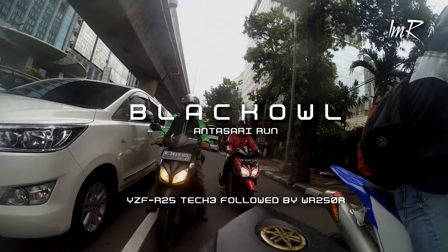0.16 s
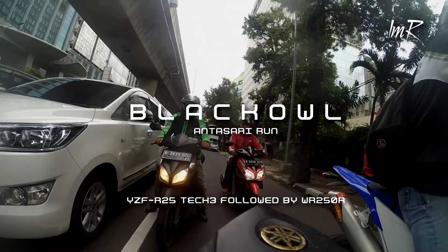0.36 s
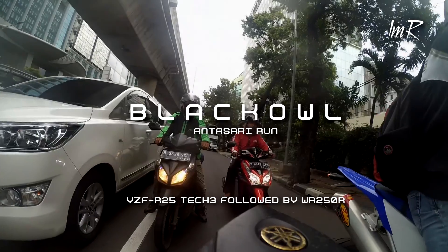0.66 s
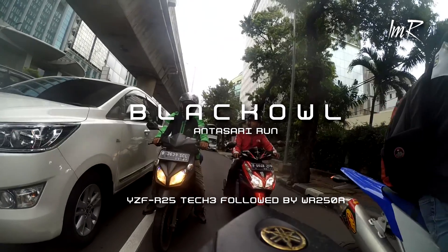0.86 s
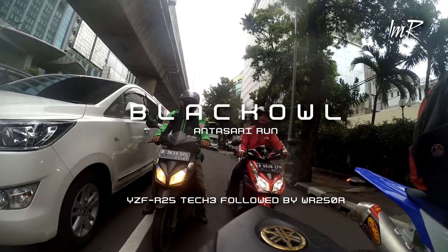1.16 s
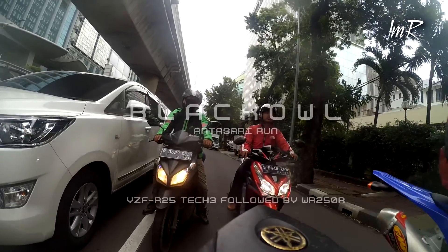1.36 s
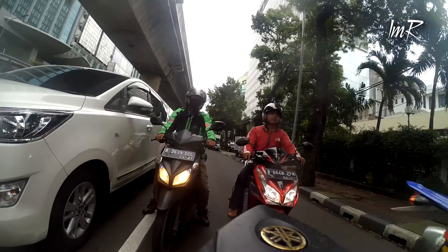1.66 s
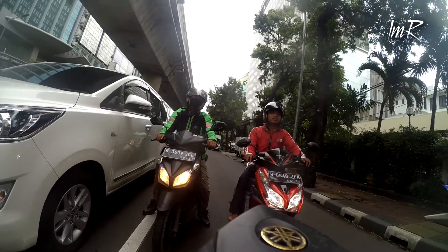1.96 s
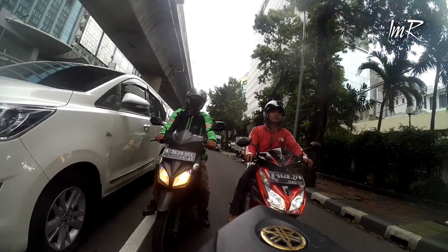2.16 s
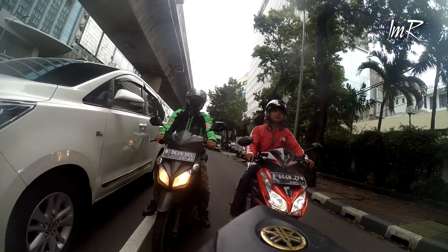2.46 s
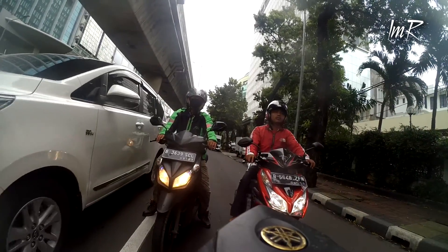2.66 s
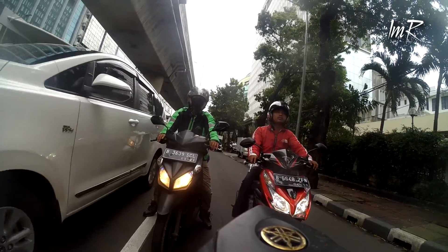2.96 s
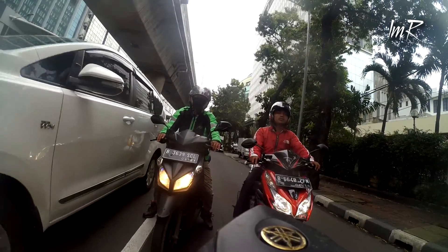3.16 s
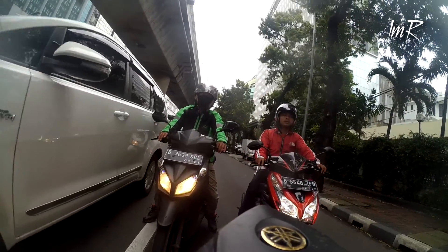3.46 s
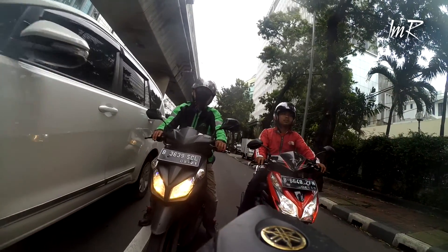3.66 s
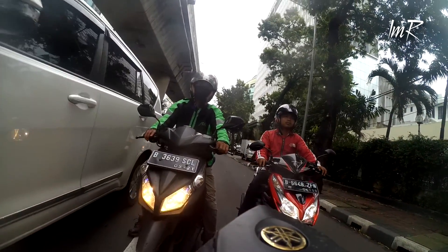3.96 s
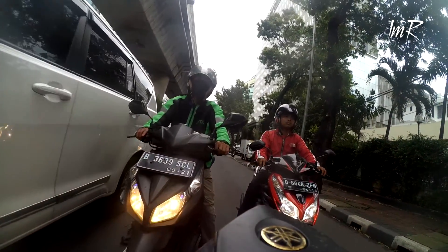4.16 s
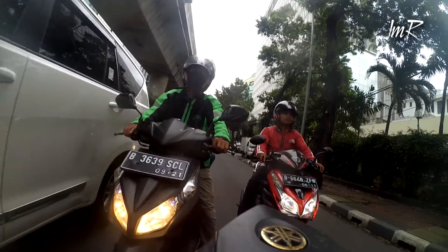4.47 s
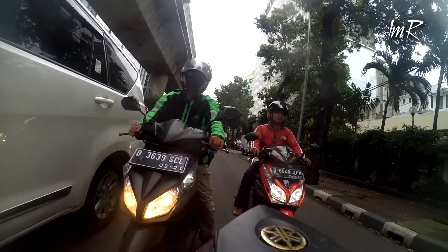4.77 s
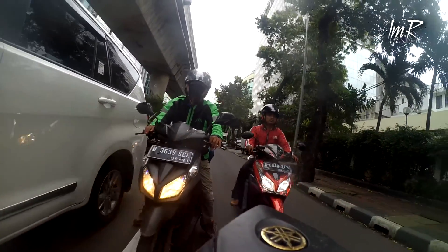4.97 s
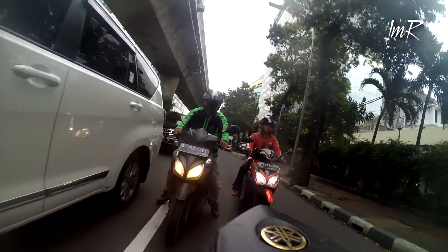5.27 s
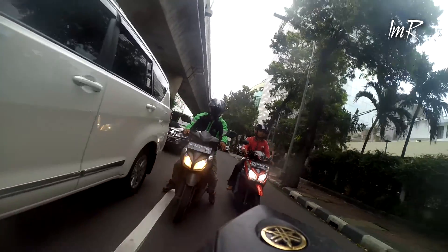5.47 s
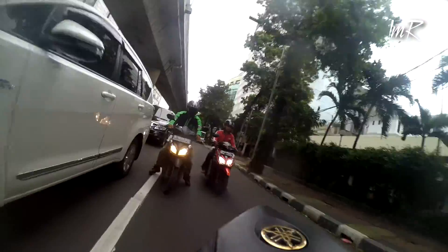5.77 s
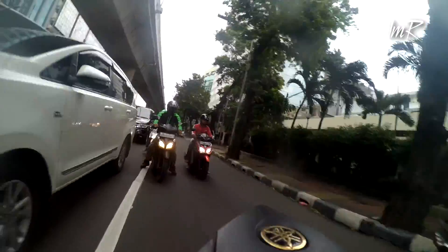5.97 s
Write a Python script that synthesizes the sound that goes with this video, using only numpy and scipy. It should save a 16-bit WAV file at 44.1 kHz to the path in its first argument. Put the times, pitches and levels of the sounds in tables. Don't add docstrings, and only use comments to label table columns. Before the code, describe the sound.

Close low chugging motorbike idle over dull traffic, a steel gear clunk and clutch lurches, then fast rising buzzy revs with small metallic rattles.

```python
import sys
import numpy as np
from scipy import signal
from scipy.fft import rfft, irfft
from scipy.io import wavfile
from scipy.ndimage import uniform_filter1d

SR = 44100
rng = np.random.default_rng(int(sys.argv[2]) if len(sys.argv) > 2 else 0)


def boost_factor(decibels):
    exponent = np.asarray(decibels, float) / 20
    return 10 ** exponent


def master_out(mix):
    frames = np.transpose(np.atleast_2d(mix))
    ceiling = np.clip(frames, -1, 1)
    pcm = np.round(ceiling * 32767).astype(np.int16)
    wavfile.write(sys.argv[1], SR, pcm)


N = 269892


def level(x, db=0):
    return x * boost_factor(db) / np.sqrt(np.mean(x ** 2))


def ring(x, modes, flip=-1):
    total = 0
    for k, (pitch_hz, width_hz, db) in enumerate(modes):
        b, a = signal.iirpeak(pitch_hz, pitch_hz / width_hz, SR)
        total = total + flip ** k * boost_factor(db) * signal.lfilter(b, a, x)
    return total


def cut(x, hz, kind, order=2):
    return signal.sosfilt(signal.butter(order, hz, kind, fs=SR, output="sos"), x)


def noise():
    return rng.standard_normal(N)


def walk(rate_hz):
    k = int(SR / rate_hz)
    steps = np.repeat(rng.standard_normal(N // k + 1), k)
    return uniform_filter1d(uniform_filter1d(steps, k), k)[:N]


def rise(x, middle, span):
    return 1 / (1 + np.exp(-(x - middle) / span))


def since(cycle, place, scatter_db):
    turn = cycle - place + 1
    strength = boost_factor(scatter_db * rng.standard_normal(256))
    return turn % 1, strength[turn.astype(int)]


# time_s, strokes_hz
SPEED = [(0, 47.18), (1.29, 46.39), (1.7, 46.72), (2.83, 46.7), (3.56, 47.29), (3.83, 46.26), (4.04, 47),
         (4.12, 45), (4.18, 47.5), (4.26, 62), (4.32, 72.47), (4.41, 105.78), (4.66, 128.27), (4.7, 134.25),
         (4.82, 139), (4.96, 138.4), (5.11, 132.7), (5.2, 132.1), (5.57, 149.5), (5.71, 160.3), (6.12, 198)]


def engine_speed(t):
    cycle_hz = np.interp(t, *np.transpose(SPEED)) / 4
    return cycle_hz, np.cumsum(cycle_hz) / SR + .93


def shake(cycle, cycle_hz):
    beat_db = np.interp(cycle_hz, [12, 14, 22, 28, 33, 34.5, 38, 42, 50],
                        [-40, -4, 2, 1, -6, -17, -12, -11, -13])
    beat_db = beat_db + 1.2 * walk(7)
    rocking = np.cos(8 * np.pi * (cycle - .137))
    beat = boost_factor(beat_db) * np.cos(6 * np.pi * (cycle + .1))
    return -np.sqrt(2) * (rocking + beat)


# place (0-1), push_db, length_cycles
STROKES = [
    (.09, -36, .047),
    (.344, -33.7, .04),
    (.393, -34.4, .024),
    (.441, -40.6, .023),
    (.623, -29.7, .083),
    (.767, -36.7, .038),
    (.862, -32.3, .046),
]
# pitch_hz, width_hz, level_db
TAIL = [(77.9, 27, 16), (167.8, 25.7, 16), (126.3, 29, 14.7)]


def pushes(cycle):
    push = 0
    for place, push_db, length_cycles in STROKES:
        gone, size = since(cycle, place - .5, scatter_db=.9)
        push = push - boost_factor(push_db) * size * np.exp(-((gone - .5) / length_cycles) ** 2)
    push = cut(push, 30.4, "high")
    return push + ring(push, TAIL)


# pitch_hz, width_hz, level_db
FRAME = [(42.3, 98, 4), (112, 120, 12.5), (173.3, 80, 5), (278, 84, -11.5), (474, 61, -5)]


def firings(cycle):
    first_place = 0.3215
    blow = 0
    for place in (first_place, first_place + 1 / 4):
        gone, size = since(cycle, place, scatter_db=1.2)
        blow = blow - size * gone * np.exp(-gone / 0.022)
    return level(ring(blow, FRAME))


def bursts(cycle, table, floor):
    out = floor
    for place, db, fade_cycles in table:
        gone, size = since(cycle, place, scatter_db=1.2)
        out = out + boost_factor(db) * size * (1 - np.exp(-gone / .012)) * np.exp(-gone / fade_cycles)
    return out


# place (0-1), clatter_db, fade_cycles
BURSTS = [
    (.05, -3.5, 0.16),
    (.27, 1.5, 0.31),
    (.53, -5, 0.26),
    (.72, -2.5, 0.38),
]
# place (0-1), puff_db, fade_cycles
PUFFS = [
    (.01, -12, .08),
    (.225, -4, .25),
    (.47, 1, .14),
    (.615, -2, .08),
    (.81, -10, .08),
]
# place (0-1), knock_db
KNOCKS = [(.02, -14), (.13, -7), (.285, -4), (.31, -3), (.33, -1), (0.371, -5), (.425, 0), (.455, -8),
          (0.581, -4.5), (.605, -6), (.665, -3.5), (0.751, -4), (.935, -8)]
# pitch_hz, width_hz, level_db
CASE = [(646, 31.5, 4), (737, 48, 0.5), (904, 74, 3.5), (1034.6, 34.7, 4.5), (1246.5, 57, -1),
        (2202, 77, -6), (2625, 310, -11.5), (2340, 43, -16), (1380, 30, -25), (1780, 74, -16),
        (2000, 270, -15)]
# pitch_hz, width_hz, level_db
COVER = [(3158, 129, -3.5), (3526, 111, -6), (3890, 31, -22), (4270, 28, -16.5)]
# pitch_hz, width_hz, level_db
LENS = [(5570, 160, -24.5), (7010, 230, -32), (8120, 340, -38)]
# pitch_hz, width_hz, level_db
RASP = [(538, 92, 2.5), (820, 160, 2), (1230, 224, 0.5), (2368, 232, 0), (3103, 133, -0.5),
        (3570, 630, -5.5), (4800, 3550, -17), (7420, 4300, -23)]


def clatter(cycle, cycle_hz):
    burst = bursts(cycle, BURSTS, .12 + .01 * cycle_hz)
    burst = burst / np.sqrt(cycle_hz / 12)
    puff = bursts(cycle, PUFFS, .1)

    happens = rng.random(N) < 60 * cycle_hz / SR
    tick_db = np.minimum(2.8 * rng.exponential(size=N), 13)
    tick = happens * boost_factor(tick_db) * rng.choice([-1, 1], N)
    knock = 0
    for place, db in KNOCKS:
        gone, size = since(cycle, place, scatter_db=1.5)
        knock = knock + boost_factor(db) * size * (np.diff(gone, prepend=0) < 0)
    drive = burst * (level(tick, -7) + noise()) + level(cut(knock, 2000, "low"), -8)

    exhaust = ring(puff * noise(), [(465.0, 45.0, 6.9)]) + ring(noise(), [(242.2, 22.0, 3.1)])
    shell = cut(cut(ring(drive, CASE), 590, "high", order=4), 2750, "low", order=8)
    lid = cut(cut(ring(drive, COVER, flip=1), 2950, "high", order=4), 4600, "low", order=8)
    small_parts = cut(ring(drive, LENS), 6030, "high", order=6)
    bright_ticks = boost_factor(-46.5) * cut(burst * level(tick), 5100, "high")
    case = level(shell + lid + small_parts + exhaust + bright_ticks)

    rasp_db = np.interp(cycle_hz, [9, 19], [-49, 5])
    rasp = level(ring(burst * noise(), RASP))
    return case / (1 + boost_factor(rasp_db)) + boost_factor(rasp_db - 5.0) * rasp


# multiple_of_cycle, level_db
WHINE = [(5, 0), (6, -9), (7, 0), (8, -2), (9, -1), (10, -12), (11, -3), (12, -3), (13, -12), (16, -7),
         (17, -10), (19, -9), (20, -11), (21, -9)]
# pitch_hz, width_hz, level_db
SWINGARM = [(174.4, 8.9, 9.5), (268.5, 64, 3.5), (470, 56, 4), (543, 89, 6.5), (894, 270, 7.5)]


def whine(cycle):
    hum = 0
    for multiple, db in WHINE:
        phase = 2 * np.pi * multiple * (cycle - .137) + .8 * walk(30)
        hum = hum + boost_factor(db + 4 * walk(9)) * np.cos(phase)
    return level(sum(ring(hum, [mode]) for mode in SWINGARM) + boost_factor(-13) * hum)


# time_s, extra_shake_db, length_s
LURCHES = [
    (4.128, 11.5, .042),
    (4.245, 10, .03),
    (4.287, 5, .018),
    (4.36, 8.5, .045),
    (4.745, -6, .03),
    (5.685, -5, .03),
]


def lurches(t):
    return sum(db * np.exp(-((t - s) / length_s) ** 2) for s, db, length_s in LURCHES)


def sway():
    tail = ring(ring(noise(), [(40.8, 1.3, 0)]), [(46.3, 46, 0)])
    plate = ring(ring(noise(), [(64.0, 66, -3.5)]), [(62.0, 46.0, 0)])
    return level(tail + plate)


# time_s, swing_db
BUMPS = [
    (4.34, -24),
    (4.93, -31),
    (5.2, -31),
    (5.62, -33),
]


def bumps(t):
    rise_s, fade_s = .07, .16
    return sum(boost_factor(db) * np.exp(-np.where(t < s, (s - t) / rise_s, (t - s) / fade_s)) for s, db in BUMPS)


def lope(t, cycle, cycle_hz):
    swing = boost_factor(-22 + 0.5 * walk(14.0)) * rise(cycle_hz, 38.8, 0.063) * np.cos(2 * np.pi * cycle)
    buck = boost_factor(-15) * np.exp(-((t - 4.36) / 0.04) ** 2) * np.cos(4 * np.pi * cycle)
    return swing + buck


# start_s, blow_db, chatter_s
CLUNKS = [(4.0338, -28, 0.0034), (4.035, -25.5, 0.011), (4.126, -24.5, 0.0035), (4.164, -44, 0.0035),
          (4.167, -42, .008), (4.234, -22, 0.0019), (4.246, -27, 0.0088), (4.277, -33, .004),
          (4.28, -33, 0.003), (4.2918, -25.5, 0.0057), (4.362, -36, 0.0025), (4.386, -27.5, 0.0021),
          (4.441, -30, .003), (4.487, -33, 0.0031), (4.531, -48, 0.0036), (4.562, -32, 0.0044),
          (5.232, -24.5, 0.0024)]
# pitch_hz, width_hz, level_db
GEARBOX = [(620, 96, -8), (915, 36, 9.5), (1200, 175, -1), (1900, 3600, -18), (2500, 82, -14),
           (3140, 130, 5.5), (4130, 350, -6.5), (5600, 2600, -24)]


def gears(t):
    touch, first, *rest = (boost_factor(db) * (t > s) * np.exp(-np.abs(t - s) / chatter_s)
                           for s, db, chatter_s in CLUNKS)
    bounces = level(np.arange(N) % 47 == 0)
    grit = .45 * bounces + noise()
    later = sum(rest) * grit
    steel = cut((touch + first) * grit, 6100, "low")
    steel = steel + cut(later, 2700, "low", order=3) + boost_factor(-25) * later
    gone_s = np.maximum(t - 4.047, 0)
    nod = boost_factor(-23) * np.exp(-gone_s / .05) * np.sin(2 * np.pi * 44 * gone_s)
    return boost_factor(15.5) * ring(steel, GEARBOX) - nod


# start_s, tap_db, pitch_hz
TAPS = [(.4123, -33, 7050), (4.299, -34, 5400), (4.7508, -19, 7544), (4.808, -29, 7000), (4.837, -29, 7500),
        (4.866, -30, 7500), (4.895, -31, 6500), (4.9498, -27, 6970), (4.98, -30, 8000), (5.3372, -27, 6990),
        (5.6119, -22, 8410), (5.654, -30, 13000), (5.659, -27, 13000), (5.664, -22, 13000),
        (5.6738, -24, 13000), (5.68, -30, 13000), (5.793, -27, 11000), (5.928, -27, 11000),
        (5.993, -25, 10000)]


def taps(t):
    return sum(boost_factor(db) * np.exp(-((t - s) / .00009) ** 2) * np.sin(2 * np.pi * pitch_hz * (t - s))
               for s, db, pitch_hz in TAPS)


# start_s, rattle_db
RATTLES = [(4.438, -44), (4.573, -44.5), (4.6525, -37), (4.7496, -30), (4.782, -39), (4.806, -37),
           (4.835, -38), (4.8634, -37), (4.8933, -34), (4.9227, -44), (4.9496, -33), (4.9844, -35),
           (5.0075, -39), (5.1858, -34.5), (5.2444, -37), (5.335, -34), (5.524, -34), (5.574, -36),
           (5.6321, -32), (5.7089, -32), (5.7678, -37), (5.7924, -36), (5.9035, -32.5), (5.9484, -31),
           (5.991, -28)]


def rattle(t):
    fade_s, mode = 0.0036, [(6650, 6000, 0)]
    blows = sum(boost_factor(db) * (t > s) * np.exp(-np.abs(t - s) / fade_s) for s, db in RATTLES)
    scrape = level(ring(ring(noise(), mode), mode))
    return boost_factor(-4) * blows * scrape


# pitch_hz, level_db
TRAFFIC = [(150, 9), (200, 1), (250, -4.5), (340, -17), (560, -9.5), (760, -3), (1500, -22), (3700, -17),
           (4600, -47)]


def traffic():
    hz, db = np.transpose(TRAFFIC)
    log_hz = np.log(np.fft.rfftfreq(N, 1 / SR) + 1)
    colour = boost_factor(np.interp(log_hz, np.log(hz), db, left=-60))
    wash = irfft(rfft(noise()) * colour, N)
    return level(wash, -48) * boost_factor(1.5 * walk(3))


def scene():
    t = np.arange(N) / SR
    cycle_hz, cycle = engine_speed(t)
    opens_s, open_s = 3.95, 4.42
    throttle = np.clip((t - opens_s) / (open_s - opens_s), 0, 1)
    lurch_db = lurches(t)

    shake_db = np.interp(throttle ** 2, [0, 1], [-30.1, -20]) + lurch_db
    firing_db = np.interp(throttle, [0, 1], [-55, -24.5]) + .5 * lurch_db
    sway_db = np.interp(throttle, [0, 1], [-50, -33.5]) + .6 * lurch_db
    push_db = -8 * throttle ** 2
    clatter_db = -41 + 4 * throttle ** 2 + 16.5 * rise(4 * cycle_hz, 139.8, 19.8)
    whine_db = shake_db + np.interp(cycle_hz, [12, 28, 33.2, 34.4, 36, 39, 50],
                                    [-34, -16, -18, -14, -17, -13, -7])
    whine_db = whine_db + 5 * np.exp(-((t - 4.88) / .15) ** 2)

    engine = boost_factor(shake_db) * shake(cycle, cycle_hz) + boost_factor(push_db) * pushes(cycle)
    engine = engine + boost_factor(firing_db) * firings(cycle)
    engine = engine + boost_factor(clatter_db) * clatter(cycle, cycle_hz) + boost_factor(whine_db) * whine(cycle)
    tail = (boost_factor(sway_db) + bumps(t)) * sway() + lope(t, cycle, cycle_hz)
    knocks = gears(t) + taps(t) + rattle(t)
    return (engine + tail + knocks + traffic())[None]


def roll_off(x):
    return signal.sosfilt(signal.butter(12, 15980, fs=SR, output="sos"), x)


def record(dry):
    ceiling, knee = .082, 9.0
    flat = dry / (1 + np.abs(dry / ceiling) ** knee) ** (1 / knee)
    flat = flat + boost_factor(-10.5) * cut(dry - flat, 10000, "high", order=4)
    mix = signal.sosfilt(signal.ellip(8, .2, 70, 15700, fs=SR, output="sos"), flat)
    return roll_off(mix)


dry = scene()
out = record(dry)
master_out(out)
```